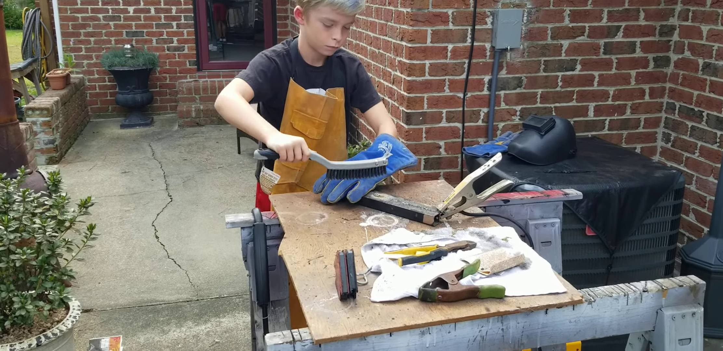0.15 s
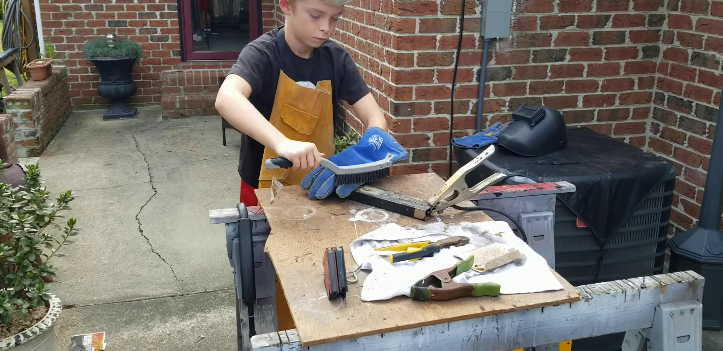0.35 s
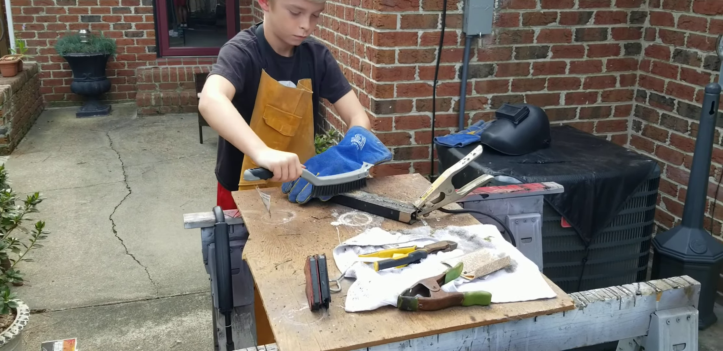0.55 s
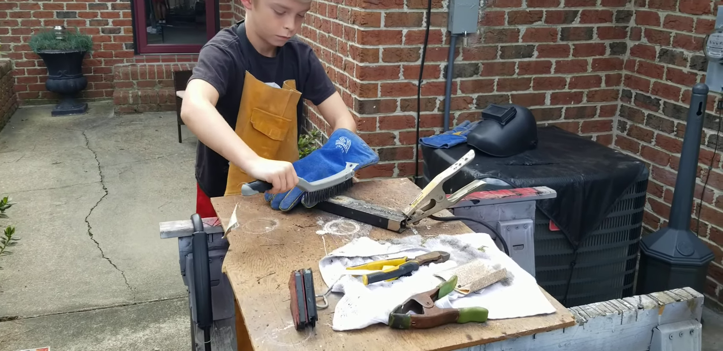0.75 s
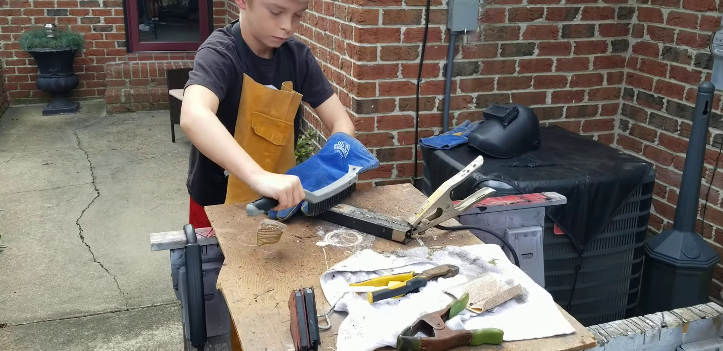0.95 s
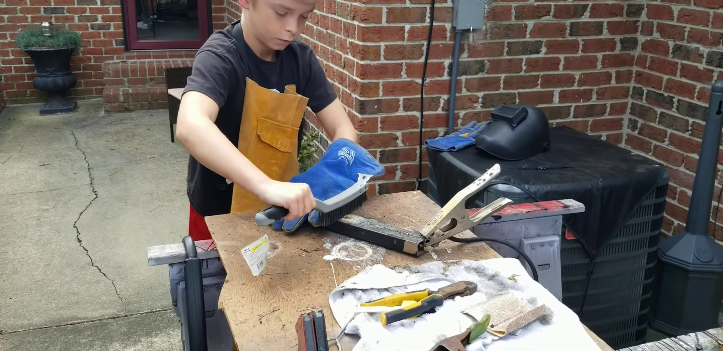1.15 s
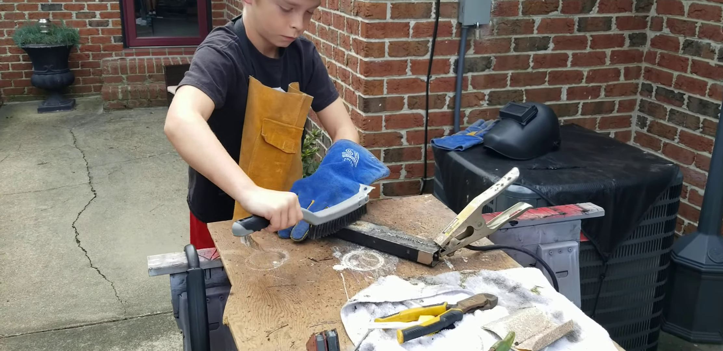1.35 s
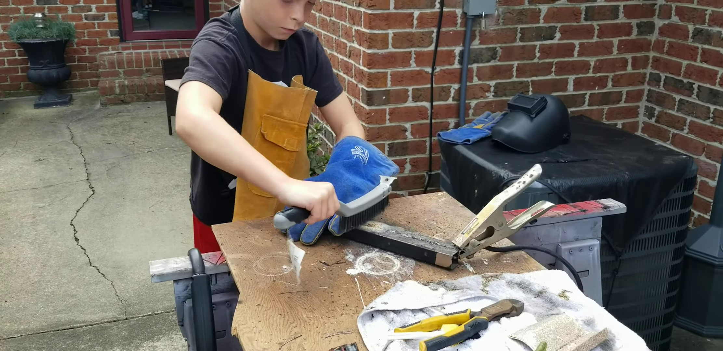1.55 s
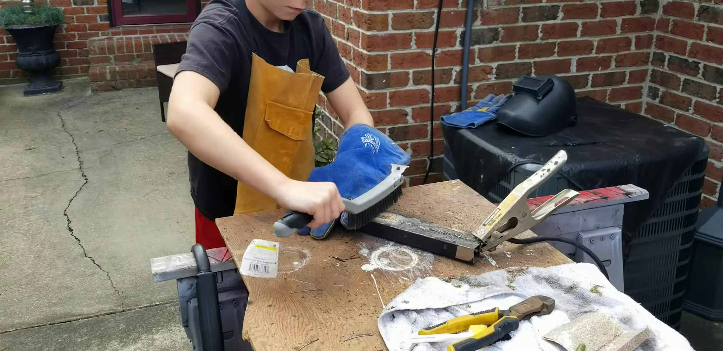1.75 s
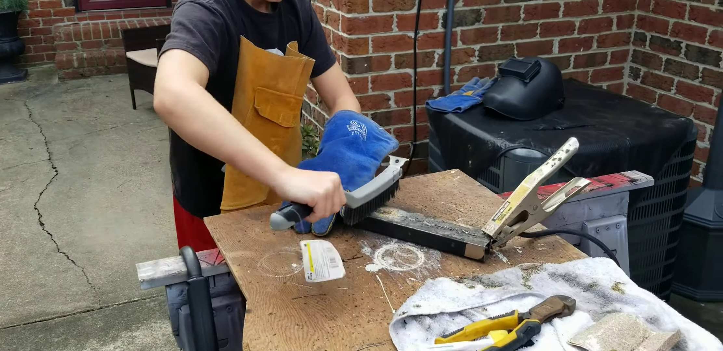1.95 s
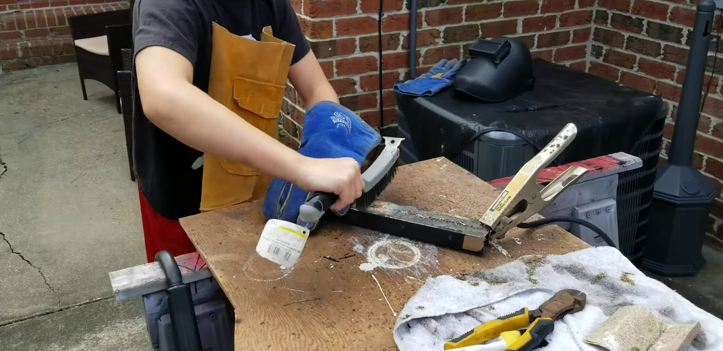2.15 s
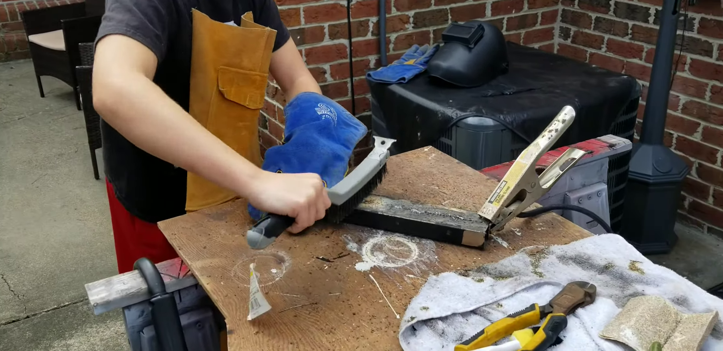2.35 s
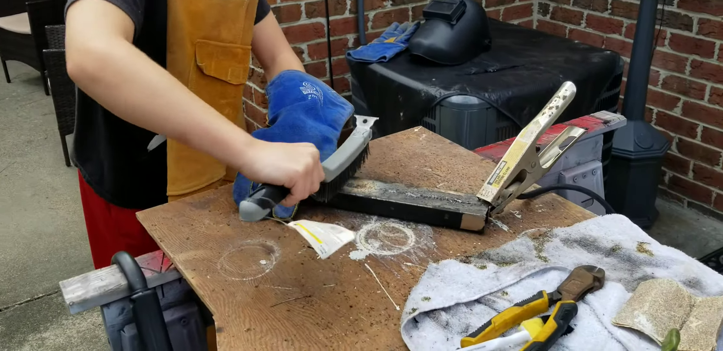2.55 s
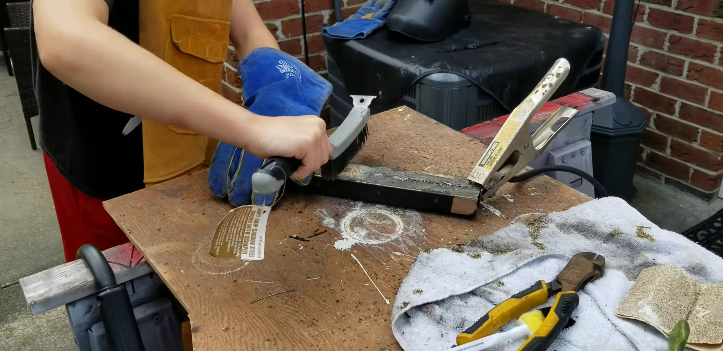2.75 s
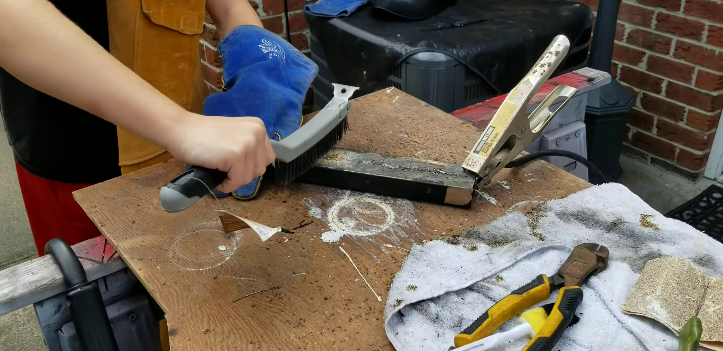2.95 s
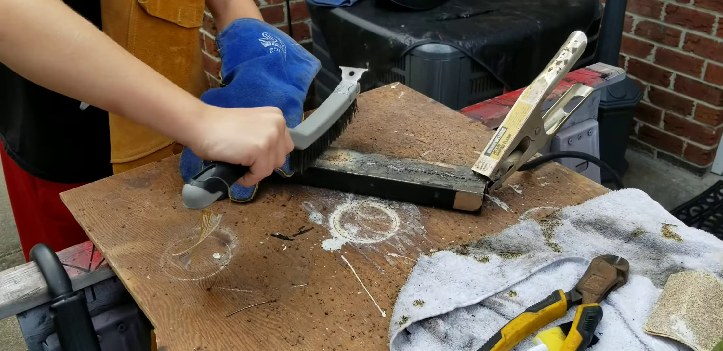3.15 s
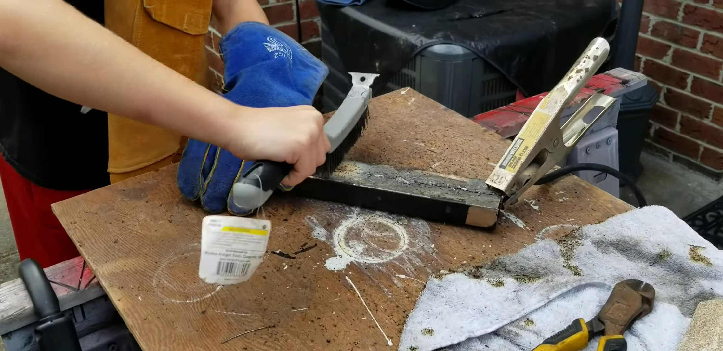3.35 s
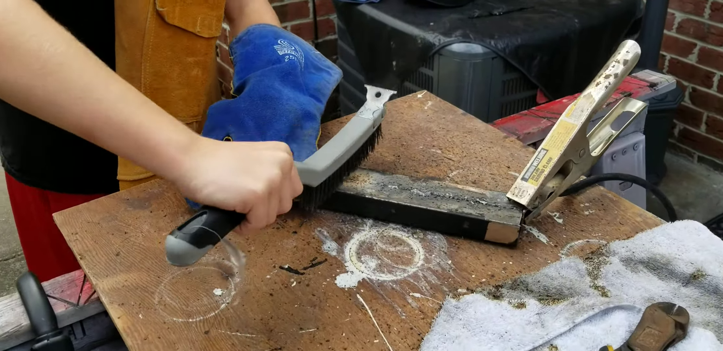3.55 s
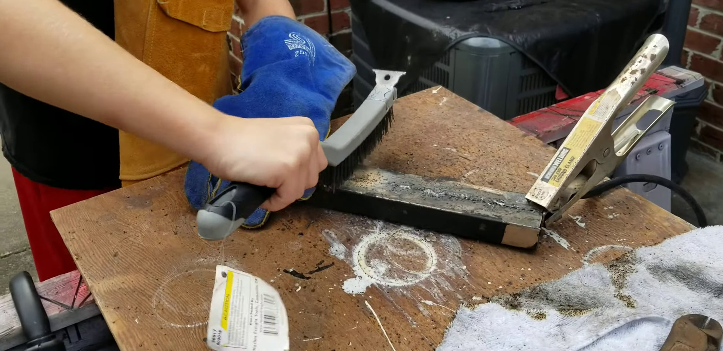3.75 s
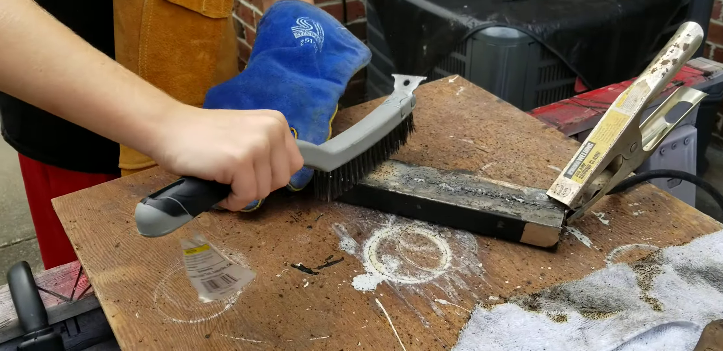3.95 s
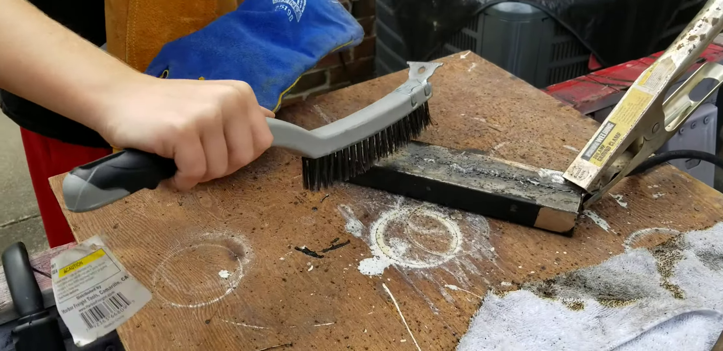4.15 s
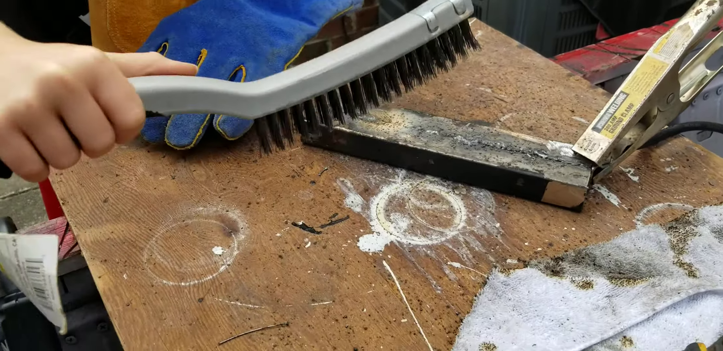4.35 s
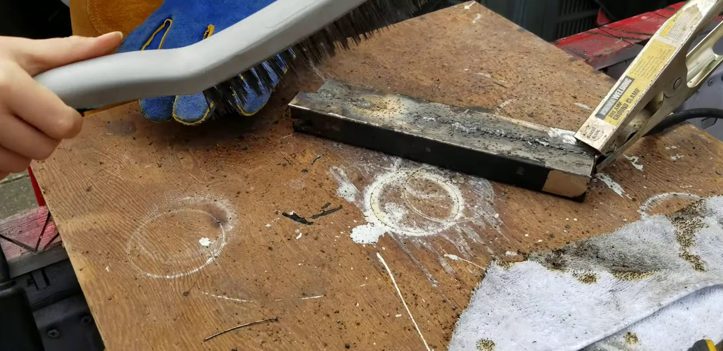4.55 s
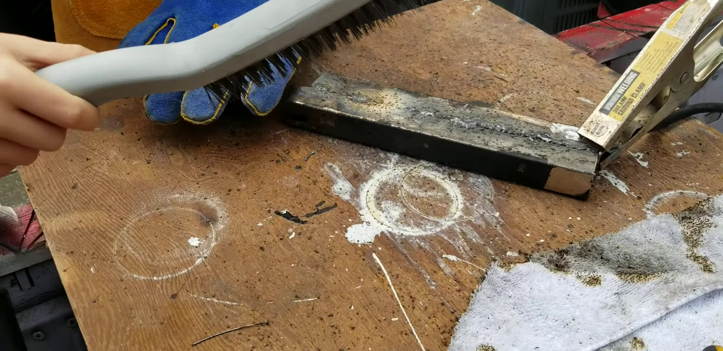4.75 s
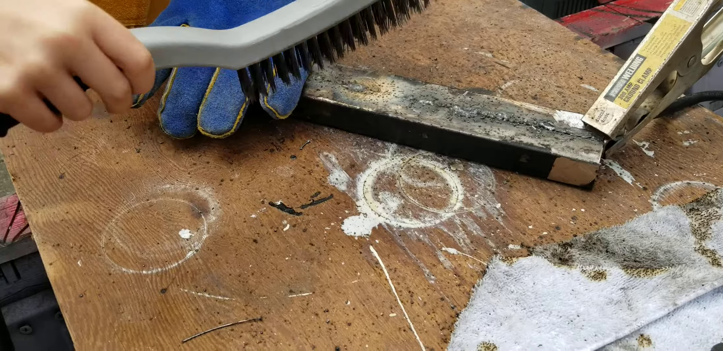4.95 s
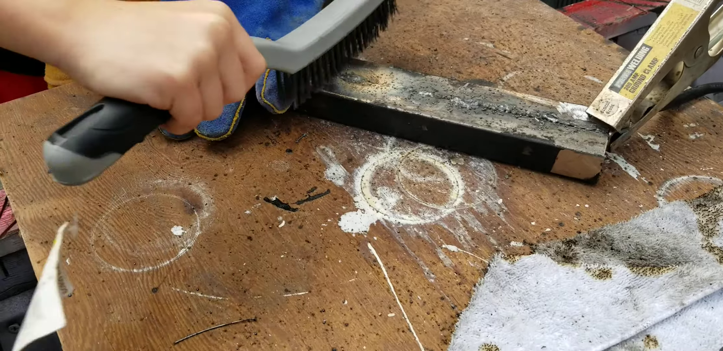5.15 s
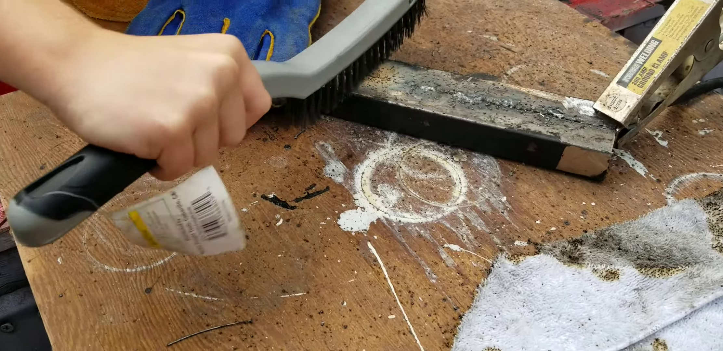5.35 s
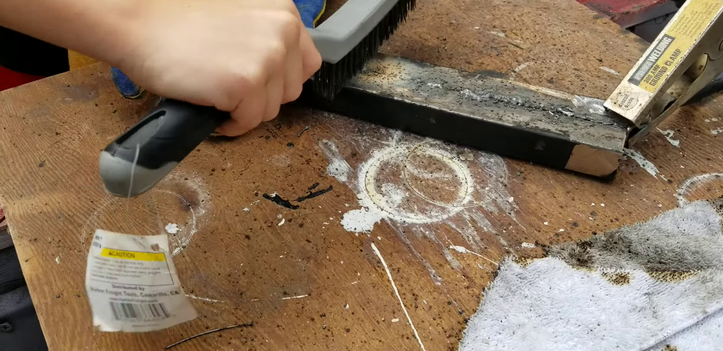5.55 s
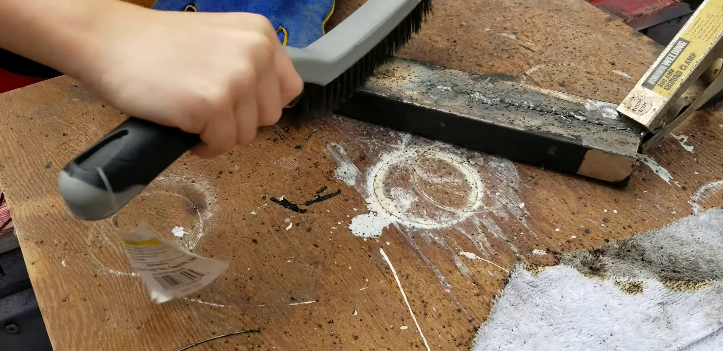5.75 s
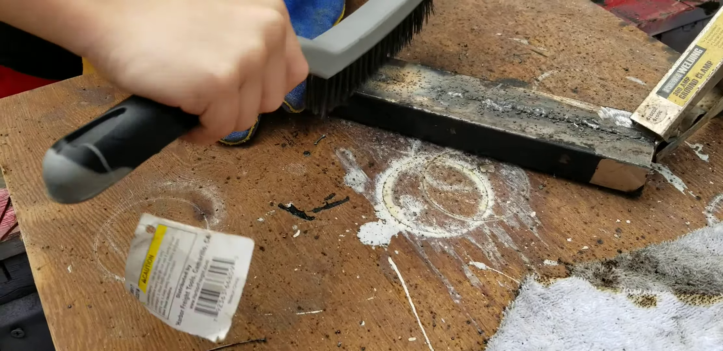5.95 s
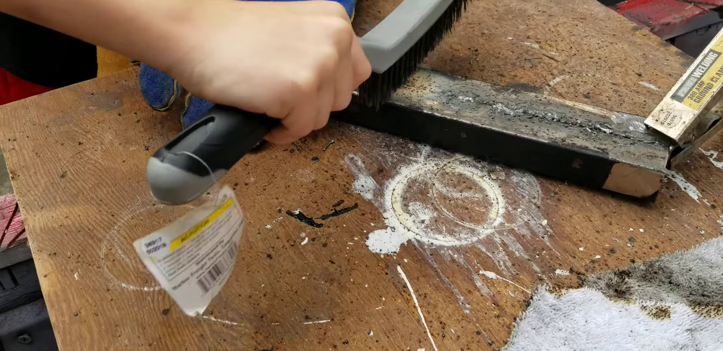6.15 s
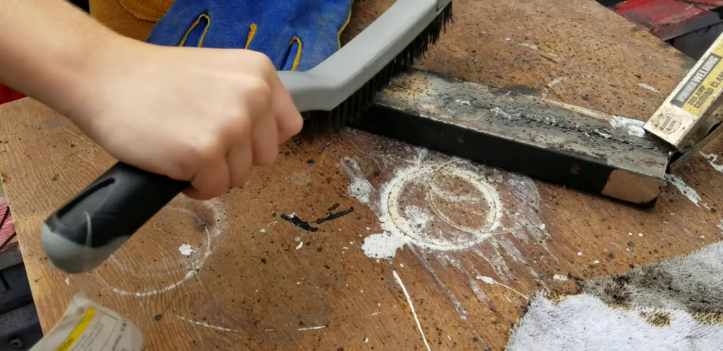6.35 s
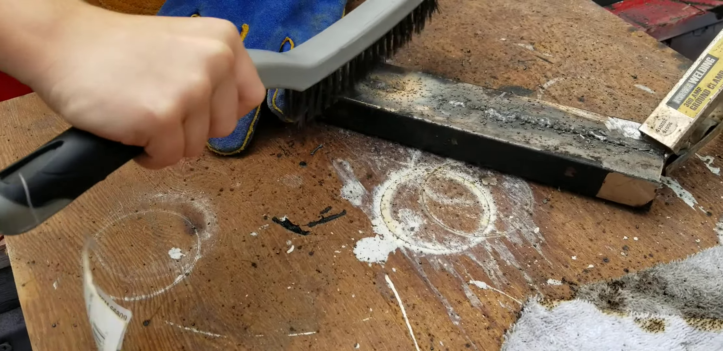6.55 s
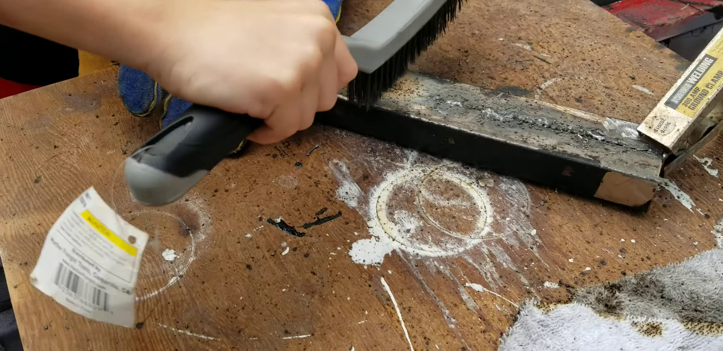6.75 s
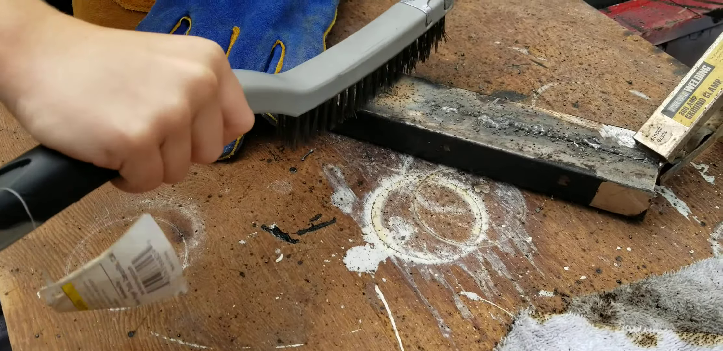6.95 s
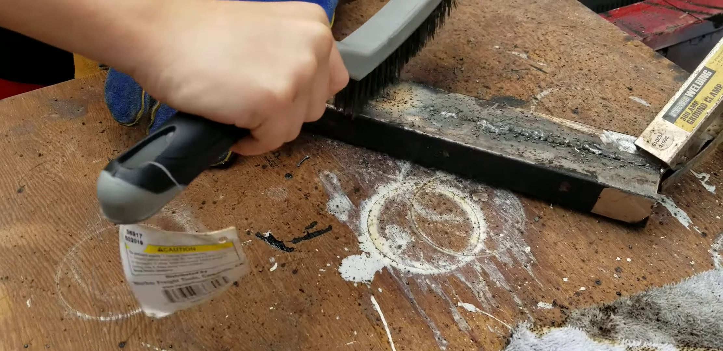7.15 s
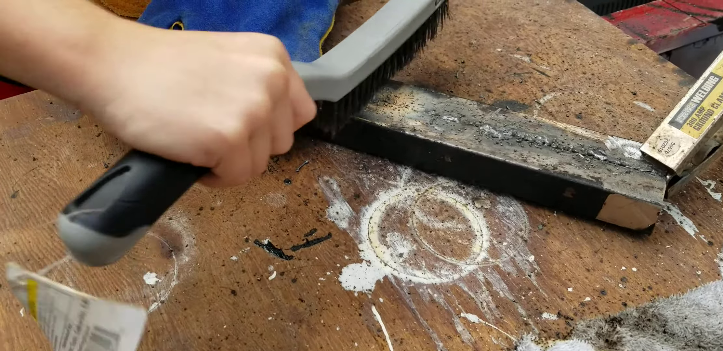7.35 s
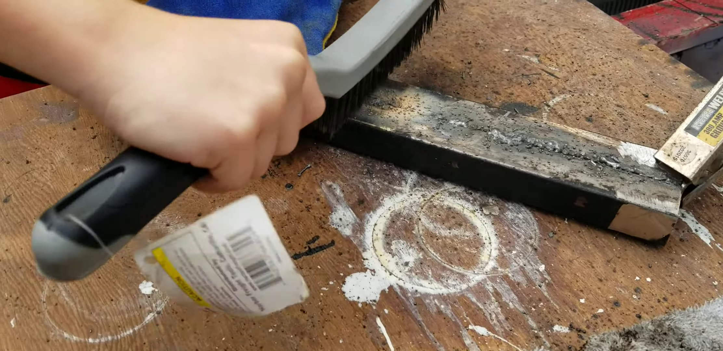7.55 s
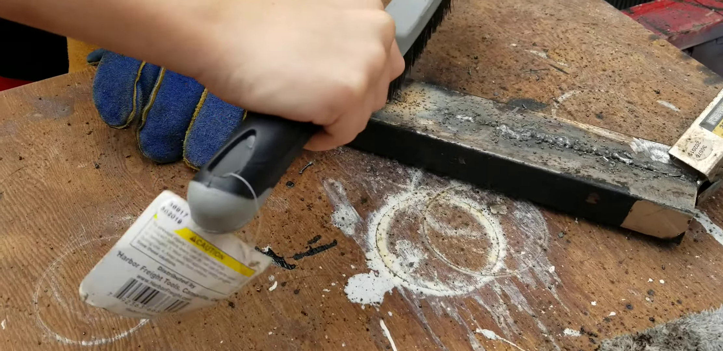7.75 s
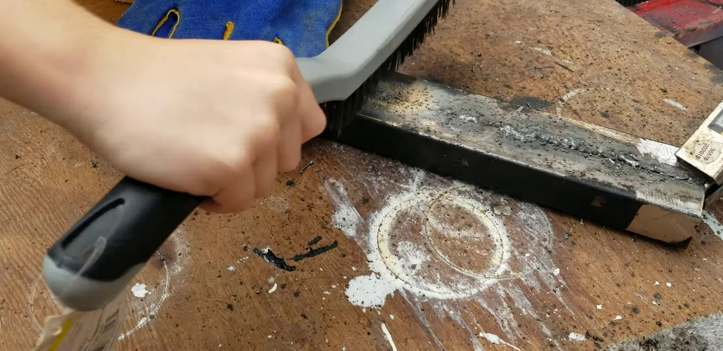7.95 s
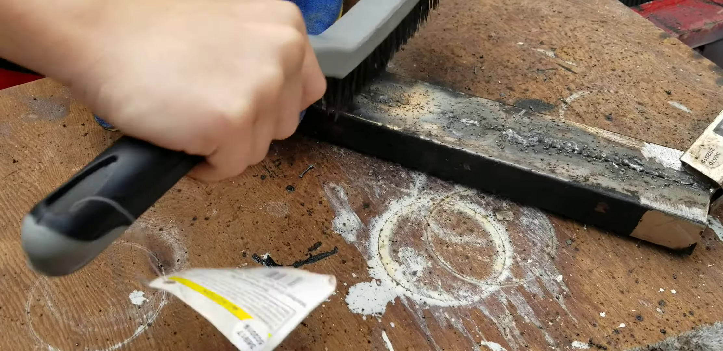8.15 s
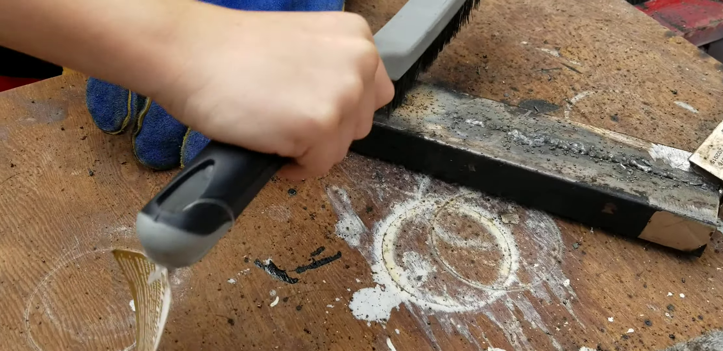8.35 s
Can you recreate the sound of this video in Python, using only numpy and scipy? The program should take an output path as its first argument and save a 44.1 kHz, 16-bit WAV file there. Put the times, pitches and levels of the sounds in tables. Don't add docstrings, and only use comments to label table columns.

```python
import sys
import numpy as np
from scipy import signal
from scipy.fft import rfft, irfft
from scipy.io import wavfile
from scipy.ndimage import uniform_filter1d

SR = 44100
rng = np.random.default_rng(int(sys.argv[2]) if len(sys.argv) > 2 else 0)


def file_out(sig):
    cols = np.atleast_2d(sig).T
    lim = np.clip(cols, -1, 1)
    pcm = np.round(lim * 32767).astype(np.int16)
    wavfile.write(sys.argv[1], SR, pcm)


def invert_db(level):
    return 10 ** (np.asarray(level, dtype=float) / 20)


N = 374850
TIME = np.arange(N) / SR
HZ = np.fft.rfftfreq(N, 1 / SR)
HOLD = 16
SLOW_TIME = TIME[::HOLD]


def evened(x):
    return x / np.sqrt(np.mean(x ** 2) + 1e-20)


def mixed(a, b, b_db):
    return evened(a) + invert_db(b_db) * evened(b)


def held(x):
    return np.repeat(x, HOLD)[:N]


def smooth_db(power):
    return uniform_filter1d(held(10 * np.log10(power)), size=160)


def read(points, hz):
    f, value = np.transpose(points)
    return np.interp(np.log(hz + 1), np.log(f + 1), value)


def wander(per_s, count):
    knots = rng.standard_normal((int(N / SR * per_s) + 2, count))
    places = np.arange(len(knots))
    return 1.22 * np.array([np.interp(SLOW_TIME * per_s, places, k) for k in knots.T])


def hiss(drive, colour, likeness, lead=((1, 0), (2, 0))):
    a, b = rfft(drive * rng.standard_normal((2, N)))
    same = np.clip(read(likeness, HZ), -1, 1)
    late = a * np.exp(-1j * read(lead, HZ))
    right = same * late + np.sqrt(1 - same ** 2) * b
    return irfft(np.array([a, right]) * invert_db(read(colour, HZ)), N)


def patchy(x, patch_db):
    z = signal.stft(x, nperseg=512, noverlap=384)[2]
    patches = uniform_filter1d(rng.standard_normal(z.shape), size=2, axis=1)
    patches = uniform_filter1d(patches, size=16, axis=2)
    return signal.istft(z * invert_db(patch_db * evened(patches)), nperseg=512, noverlap=384)[1][:, :N]


def snaps(per_s, spread_db, clump_db):
    size_db = spread_db * np.minimum(rng.exponential(1, N), 3.5)
    size_db = size_db + clump_db * held(wander(180, count=1)[0])
    return evened(invert_db(size_db) * (rng.random(N) < per_s / SR))


def ring(drive, modes, flicker_db, per_s, turns, order=1):
    out = np.zeros((2, N))
    for (hz, width, *db), drift in zip(modes, wander(per_s, count=len(modes))):
        pole = np.exp((2j * hz - width) * np.pi / SR)
        bout_db = np.where(SLOW_TIME < 4.5, db[0], db[-1])
        z = drive * rng.standard_normal(N) * held(invert_db(flicker_db * drift + bout_db))
        for _ in range(order):
            z = signal.lfilter([1 - abs(pole)], [1, -pole], z)
        other_drift = np.roll(drift, len(drift) // 3)
        lag = held(np.exp(-1j * turns * hz / 1000 * (1 + other_drift)))
        out[0] += z.real
        out[1] += (z * lag).real
    return out


# (frequency [Hz], level [dB per Hz])
AIR = [(20, -28), (62, -2), (86, -6), (125, -6), (160, -15), (290, -25), (420, -31), (1100, -30),
       (1600, -36.5), (2600, -54), (5000, -51.5), (6800, -63), (8800, -69), (10500, -46.5), (13000, -42.5),
       (16000, -51)]
# (frequency [Hz], likeness [-1 to 1])
AIR_SAME = [(60, 0.85), (180, 0.87), (550, 0.078), (1650, -0.38), (4970, 0.1), (15000, -0.28)]
# (time [s], level [dB])
SWELL = [(0, 5.5), (.4, 4.5), (4.2, 1.5)]


def air():
    x = evened(hiss(np.ones(N), AIR, AIR_SAME))
    x = x * invert_db(-49 + held(wander(2.2, count=1)[0]))
    low = signal.butter(2, 200, fs=SR, output="sos")
    hum = signal.sosfiltfilt(low, x)
    return hum + (x - hum) * invert_db(np.interp(TIME, *np.transpose(SWELL)))


def speed(share, fastest):
    u, p = np.clip(share, 0, 1), np.clip(fastest, .02, .98)
    return np.sin(np.pi / 2 * np.where(u < p, u / p, (1 - u) / (1 - p)))


LIFT_S, LIFT_DB = (4.0, 8.6), -51


def arches(bouts, law, lead=0):
    power, t = 1e-10, SLOW_TIME + lead
    for rows, lift in zip(bouts, LIFT_S):
        s, top_db, fastest, turn_db = np.transpose(rows)
        s = np.append(s, lift)
        k = np.clip(np.searchsorted(s, t) - 1, 0, len(rows) - 1)
        hand = speed((t - s[k]) / np.diff(s)[k], fastest[k])
        moving = invert_db(top_db[k]) * hand ** np.array(law)[k % 2]
        drag = invert_db(np.interp(t, s, np.append(turn_db, LIFT_DB), left=-100, right=-100))
        power = power + moving ** 2 + drag ** 2
    return power


# (turn time [s], full-speed fizz level [dB], fastest point [share 0-1], fizz level at the turn [dB])
STROKES_A = [(0.546, -43, 0, -61), (0.675, -35.5, 0.7, -54), (0.766, -33, 0.07, -38.5),
             (0.95, -37, 0.23, -52.5), (1.073, -26, 0.34, -52.5), (1.253, -30.5, 0.51, -45),
             (1.367, -23.5, 0.39, -49), (1.552, -31.5, 0.45, -48), (1.701, -21.5, 0.32, -40.5),
             (1.887, -30, 0.44, -41), (2.028, -24.5, 0.22, -41.5), (2.201, -29, 0.34, -49),
             (2.343, -23, 0.34, -49), (2.497, -32, 0.6, -49), (2.634, -25, 0.25, -42),
             (2.825, -31, 0.67, -44), (2.977, -24, 0.39, -46), (3.145, -35.5, 0.2, -30.5),
             (3.241, -25, 0.42, -40), (3.426, -25, 0.49, -33), (3.585, -21, 0.35, -34.5),
             (3.737, -29, 0.3, -38.5), (3.902, -38, 0.65, -48)]
# (time [s], level [dB], fastest [share 0-1], level at the turn [dB])
STROKES_B = [(5.118, -40, 0.3, -47.5), (5.272, -33.5, 0.14, -47.5), (5.418, -24, 0.43, -46),
             (5.568, -32, 0.52, -40.5), (5.701, -24, 0.25, -35.5), (5.896, -33.5, 0.9, -37),
             (6.032, -21, 0.38, -36), (6.166, -28.5, 0.71, -35.5), (6.302, -25, 0.28, -33.5),
             (6.478, -30, 0.9, -29.5), (6.584, -24.5, 0.63, -32.5), (6.787, -27, 0.94, -31),
             (6.949, -20, 0.35, -40.5), (7.145, -29, 0.83, -35.5), (7.284, -21, 0.48, -42.5),
             (7.475, -28, 0.6, -36), (7.599, -21.5, 0.52, -40), (7.777, -27, 0.44, -33.5),
             (7.913, -23, 0.65, -36), (8.091, -26.5, 0.4, -39), (8.226, -22, 0.52, -32),
             (8.442, -27, 0.86, -39.5)]
# (start time [s], length [s], fizz level [dB], fastest point [share 0-1])
RUSTLES = [
    (0.39, 0.13, -63, 0.3),
    (0.5, 0.06, -49, 0.8),
    (3.62, 0.25, -63.5, 0.3),
    (4.812, 0.145, -66, 0.03),
    (3.3, .08, -60, .4),
]


def strokes():
    t, slack_s = SLOW_TIME, 0.0096
    rustle = 0
    for s, length, db, fastest in RUSTLES:
        rustle = rustle + invert_db(db) ** 2 * speed((t - s) / length, fastest) ** 3
    ahead = np.transpose(DIGS)[0][:, None] - t
    slack_db = -3.5 * (np.exp(-abs(ahead) / slack_s) * (ahead > 0)).max(0)
    return smooth_db(arches((STROKES_A, STROKES_B), law=(2.01, 1.31)) + rustle) + held(slack_db)


# (time [s], fizz peak level [dB], scrape over fizz [dB], bench over fizz [dB])
DIGS = [(0.4218, -46, -26, 4), (0.506, -49, -13, -9), (0.5193, -41, -19, 13), (0.547, -19, -12, -15),
        (0.705, -24.5, -38, -31), (0.774, -27, -22, -25), (0.959, -28.5, -21.5, 6), (1.0836, -41, -6, -10),
        (1.273, -21, -27, -23), (1.394, -32, -26, -22), (1.5713, -19.5, -33, -15), (1.722, -19, -34, -18),
        (1.899, -24, -13, -8), (2.05, -22, -28, -15.5), (2.22, -35, -10, -7), (2.365, -34, -18, -19),
        (2.515, -30, -15, -15), (2.539, -19, -14, -10), (2.996, -24, -19, -18), (3.9746, -36, -27, 4.5),
        (4.1964, -46, -30, -8), (4.4243, -62, -21.5, 2.5), (4.6957, -60, -5, 1), (5.1238, -20.5, -11.5, 1),
        (5.5917, -26.5, -2, -5), (6.9755, -20, -11, -21), (7.3083, -16, -11, -15), (7.9455, -20.5, -6, -1),
        (8.109, -22, -6, -18.5)]
# (time [s], peak level [dB])
NICKS = [(0.6883, -26), (1.1048, -23.5), (1.4157, -15.5), (1.6, -8.5), (1.9167, -21), (3.4678, -15.5),
         (3.6082, -18), (3.7683, -17.5), (6.0562, -15), (6.1933, -12.5), (6.5161, -16), (7.1792, -10),
         (7.2515, -20), (7.3413, -14), (7.5213, -16), (7.641, -21), (7.804, -8), (8.1594, -15),
         (8.2468, -17), (8.4851, -14.5)]
KNOCKS = DIGS + [(s, db - 8.5, -15, -40) for s, db in NICKS]
KNOCK_S = 0.0031


def played(level_db, knock_db, train, voice):
    drive = train * invert_db(level_db)
    for row, db in zip(KNOCKS, knock_db):
        place = drive[round(row[0] * SR):][:4000]
        place += invert_db(db) * np.exp(-TIME[:len(place)] / KNOCK_S)
    out = voice(drive)
    return out * np.sqrt(np.mean(drive ** 2) / np.mean(out.mean(0) ** 2))


# (frequency [Hz], level [dB per Hz])
FIZZ = [(4410, -17.5), (7500, -6), (8350, -31), (8740, -6.5), (9460, 2.5), (10500, 3), (12900, 9.5),
        (15500, 0), (16100, -44.5), (16400, -36.5)]
# (frequency [Hz], likeness [0-1])
SAME = [(60, 1), (130, 0.69), (290, 0.99), (640, 0.84), (1410, 1), (3100, 0.34), (6820, 0.36),
        (15000, 0.42)]
# (frequency [Hz], phase [rad])
LEAD = [(0, -1.5), (1890, 0.5), (3530, -5), (5860, 6.5), (6290, 5), (8960, 14.5), (12400, -11.5),
        (16100, -10)]
# (frequency [Hz], width [Hz])
BAR_HIGH = [(8958, 32), (9437, 40), (10125, 45), (10824, 34), (11690, 40), (12430, 55), (12610, 80),
            (12908, 55), (13498, 70), (14965, 45)]
# (level in the first bout [dB], level in the second bout [dB])
HIGH_DB = [(-15, 5), (1, -13.5), (2, -4), (5.5, 9), (-5, 3), (3, 8), (-9.5, 3), (-9.5, -8.5), (8.5, 2.5),
           (-15, -18)]


def fizz(stroke_db):
    def voice(drive):
        tips = patchy(hiss(drive, FIZZ, SAME, LEAD), 4.3)
        steel = ring(drive, np.c_[BAR_HIGH, HIGH_DB], 3.5, 18, turns=0.24)
        return mixed(tips, steel, -4.0)

    knock_db = [k[1] - 7 for k in KNOCKS]
    return played(stroke_db - 4.0, knock_db, snaps(8000, 1.3, 1.75), voice)


# (time [s], scrape over fizz level [dB])
BITE = [(0.42, -18), (0.52, -13.5), (0.58, -10.5), (0.8, -13.5), (1.8, -13.5), (2.6, -8.5), (3.7, -12.5),
        (4.0, -7.5), (4.85, -14.5), (5.2, -8.5), (6.9, -8.5), (8.4, -7.5)]
# (frequency [Hz], level [dB per Hz])
SCRAPE = [(470, -9), (800, -6.5), (913, -20.5), (1820, -12), (2110, -14.5), (2590, -2.5), (3810, -3.5),
          (5880, -0.5), (6640, -9.5), (9000, -8.5), (11700, -33), (19800, -120)]
# (frequency [Hz], width [Hz])
BAR_LOW = [(2637, 24), (2990, 30), (3500, 40), (4180, 60), (4685, 45), (5115, 65), (5641, 16), (5824, 40),
           (6246, 26), (6990, 28), (7360, 35), (7890, 90), (6017, 30)]
# (level in the first bout [dB], level in the second bout [dB])
LOW_DB = [(3.5, 3.5), (-11, -9), (-25, -14.5), (-5, -6), (-1.5, -1.5), (3, 3), (-11, -15), (-6, 1.5),
          (1, 4.5), (1.5, -11.5), (-20.5, -27), (-28, -13), (-27, -8)]


def scrape(stroke_db, load_db):
    def voice(drive):
        grind = patchy(hiss(drive, SCRAPE, SAME, LEAD), 5.0)
        steel = ring(drive, np.c_[BAR_LOW, LOW_DB], 3.4, 22, turns=0.18)
        return mixed(grind, steel, -4.5)

    pressed_db = 0.16 * (np.maximum(load_db, -55) + 32.0)
    level_db = 0.64 * (stroke_db + 26.0) - 27.5 + pressed_db
    level_db = level_db + np.interp(TIME, *np.transpose(BITE))
    knock_db = [k[1] + k[2] - 3 for k in KNOCKS]
    return played(level_db, knock_db, snaps(3200, 1.83, 0.79), voice)


# (rumble level [dB], heaviest point [share 0-1], rumble level at the turn [dB])
LOADS_A = [(-35.5, 0, -52), (-52, .7, -57.5), (-41, 0.2, -55.5), (-35, 0, -50), (-39, .05, -40.5),
           (-36.5, 0.5, -63), (-35.5, .2, -43), (-32, .5, -66), (-32, 0, -43.5), (-35.5, 0.5, -62),
           (-33.5, 0.2, -46), (-30.5, .32, -58), (-33.5, 0.05, -46), (-29, 0.61, -59), (-36, .2, -47),
           (-40.5, 0.4, -39.5), (-35, 0.3, -38), (-35.5, 0.6, -43.5), (-34, 0.77, -39),
           (-30.5, 0.48, -41.5), (-33, .22, -45), (-31.5, .48, -45), (-48, 0.4, -49.5)]
# (rumble level [dB], heaviest point [share 0-1], rumble level at the turn [dB])
LOADS_B = [(-35.5, 0, -54), (-32, 0.4, -36.5), (-33, 0.1, -61), (-29.5, 0.43, -48.5), (-38.5, 0.1, -35),
           (-28.5, 0.44, -45), (-32.5, 0.23, -43.5), (-28.5, 0.76, -51.5), (-36, .36, -38.5),
           (-36.5, .95, -46.5), (-35.5, 0.9, -34.5), (-30, 0.83, -49), (-33, 0.16, -38.5), (-33, .85, -44),
           (-33.5, 0.46, -44), (-34, .67, -46.5), (-33.5, 0.5, -43.5), (-31, 0.49, -45), (-35, 0.6, -45.5),
           (-37, 0.3, -46.5), (-37, 0.4, -39.5), (-32, 0.4, -44.5)]


def loads():
    bouts = []
    for rows, weights in ((STROKES_A, LOADS_A), (STROKES_B, LOADS_B)):
        bouts.append(np.c_[np.transpose(rows)[0], weights])
    return smooth_db(arches(bouts, law=(1.25, 1.33), lead=0.0073))


# (frequency [Hz], width [Hz], level in the first bout [dB], level in the second bout [dB])
BENCH = [(62, 15, -24, -5.5), (113.6, 57, -1, 2), (150.7, 39, -12.5, -2.5), (201, 55, -6, -2.5),
         (265.2, 61, -1, 3.5), (311.2, 47, -2.5, -10), (412, 79, -30.5, -12.5), (501, 47, -17, -14.5),
         (581, 100, -15, -8.5), (687, 114, -16.5, -20), (920.4, 62, -24, -17.5), (1546, 89, -34.5, -25.5)]
# (frequency [Hz], level [dB per Hz])
RATTLE = [(500, -14.5), (800, -22), (1300, -4), (1800, -7), (2300, -3), (3500, -33)]


def bench(load_db):
    def voice(drive):
        boom = ring(drive, BENCH, 2.7, 12, turns=0.26, order=2)
        rattle = patchy(hiss(drive, RATTLE, SAME), 5.7)
        return mixed(boom, rattle, -21.5)

    knock_db = [k[1] + k[3] - 4 for k in KNOCKS]
    return played(load_db - 0.6, knock_db, snaps(1800, 2.2, 1.4), voice)


def ticks():
    out, t = np.zeros((2, N)), TIME[:400]
    bright = signal.butter(2, 7000, "high", fs=SR, output="sos")
    for row, noise in zip(DIGS, rng.standard_normal((len(DIGS), 2, len(t)))):
        click = signal.sosfilt(bright, noise * np.exp(-t / 0.00032))
        out[:, round(row[0] * SR):][:, :len(t)] += invert_db(row[1] - 9) * click / abs(click).max()
    return out


def rung(s, db, hz, length):
    t, rise_cycles = TIME[:6000], 0.7
    swell = 1 - np.exp(-t * hz / rise_cycles)
    tone = np.sin(2 * np.pi * hz * t) * swell * np.exp(-t / length)
    return round(s * SR), invert_db(db) * tone / abs(tone).max()


# (time [s], peak level [dB], pitch [Hz])
THUMPS = [(0.545, -22.5, 134.5), (0.957, -28.5, 99), (1.084, -28, 135), (1.261, -33, 106),
          (1.398, -33, 116), (1.577, -30, 301), (1.903, -29, 109), (2.037, -31.5, 308), (2.214, -24, 285),
          (2.359, -29.5, 116), (2.537, -26.5, 117), (2.669, -32.5, 280), (2.932, -28, 277),
          (2.989, -26.5, 291), (3.168, -23.5, 255), (3.301, -30, 266), (3.36, -34.5, 127),
          (3.476, -24.5, 280), (3.606, -27, 259), (3.777, -25.5, 225), (3.903, -33, 215), (5.119, -22, 109),
          (5.306, -24, 248), (5.437, -20, 253), (5.574, -23, 259), (5.711, -28, 264), (5.925, -20, 95),
          (6.038, -27, 190), (6.223, -17, 124), (6.545, -29, 111), (6.909, -14, 201), (6.989, -22, 136),
          (7.173, -25, 253), (7.224, -15.5, 140), (7.316, -20, 256), (7.39, -28, 277), (7.535, -26.5, 121),
          (7.634, -30, 136), (7.812, -26, 204), (7.943, -27, 111), (8.109, -33, 102), (8.345, -27.5, 105)]
# (time [s], peak level [dB], pitch [Hz], length [s])
PINGS = [
    (0.55, -36, 7000, 0.014),
    (0.551, -42, 7400, .01),
    (0.63, -51, 4600, 0.024),
    (5.75, -36, 2615, .018),
    (8.314, -28, 8960, 0.016),
]


def blows():
    out = np.zeros(N)
    tones = [rung(s, db - 6, hz, 2.4 / hz) for s, db, hz in THUMPS]
    tones += [rung(*ping) for ping in PINGS]
    for at, tone in tones:
        out[at:][:len(tone)] += tone[:N - at]
    return out


# (time [s], peak level [dB], pitch [Hz], length [s])
TAPS = [(0.546, -32.5, 4600, 0.001), (0.87, -38, 1270, 0.02), (2.544, -40, 1600, .006),
        (3.193, -37.5, 1520, 0.076), (3.81, -37.5, 1295, 0.0214), (4.051, -48.5, 1020, 0.079),
        (5.123, -18.5, 170, 0.0076), (5.161, -33, 1520, 0.0062), (5.383, -37, 1700, .002),
        (5.441, -20, 225, 0.015), (6.917, -18.5, 181, 0.0072), (5.69, -20, 2470, 0.0016),
        (7.462, -17.5, 5160, 0.00098), (7.57, -32, 1100, .0015), (5.69, -29.5, 1100, 0.0017),
        (7.458, -27, 1880, .0012), (1.28, -38.5, 1550, 0.071), (1.594, -36.5, 1600, 0.032),
        (1.754, -41, 1350, .03)]


def taps():
    out, t = np.zeros(N), TIME[:6000]
    for (s, db, hz, length), noise in zip(TAPS, rng.standard_normal((len(TAPS), len(t)))):
        band = signal.butter(3, [0.4 * hz, 1.43 * hz], "band", fs=SR, output="sos")
        burst = signal.sosfilt(band, noise * np.exp(-t / length))
        out[round(s * SR):][:len(t)] += invert_db(db) * burst / abs(burst).max()
    return out


# (time [s], treble level, left over right [dB])
TILT = [
    (0.0, 8),
    (0.5, 27),
    (2.03, 15.5),
    (8.5, 11.5),
]


def turning():
    lean_db = np.interp(TIME, *np.transpose(TILT)) - 10.5
    return invert_db(np.outer([.3, -.7], lean_db))


def scene():
    stroke_db, load_db = strokes(), loads()
    bright = fizz(stroke_db) + ticks()
    dull = scrape(stroke_db, load_db) + bench(load_db) + blows() + taps()
    return air() + bright * turning() + dull


# (frequency [Hz], level, left over right [dB])
PORTS = [(60, 5), (110, 4.5), (200, 2.5), (380, 3), (700, 4), (1290, 5), (2380, -2), (4400, 0.5),
         (8120, 11), (15000, 9)]


def ported(dry):
    return irfft(rfft(dry) * invert_db(np.outer([.4, -.6], read(PORTS, HZ))), N)


# (frequency [Hz], depth [dB])
HOLES = [(1800, 30), (2100, 2.5), (2600, 7), (3300, 3), (4000, 2.5), (5000, 3.5), (5800, 6.5), (8400, 6),
         (8800, 30)]


def thinned(x, quiet_db):
    hz, t, z = signal.stft(x, SR, nperseg=1024, noverlap=768)
    power = uniform_filter1d((abs(z) ** 2).sum(0), size=8, axis=1)
    share = uniform_filter1d(power, size=4, axis=0) / uniform_filter1d(power, size=45, axis=0)
    usual = np.sqrt(np.median(share, axis=1))
    weak = share < (usual * invert_db(-2 * read(HOLES, hz)))[:, None]
    weak = weak[np.arange(len(hz)) // 4 * 4][:, np.arange(len(t)) // 4 * 4]
    loud = power[hz > 2000].mean(0) > invert_db(2 * quiet_db)
    return signal.istft(z * ~(weak & loud), SR, nperseg=1024, noverlap=768)[1][:, :N]


def band_limit(x):
    return signal.sosfilt(signal.butter(12, 16510, fs=SR, output="sos"), x)


def record(dry):
    rounded = .75 * np.tanh(ported(dry) / .75)
    top = invert_db(-np.clip((HZ - 15740) / 2.5, 0, 60))
    rumble_cut = 1 / (1 + (27 / (HZ + 1)) ** 4)
    limited = irfft(rfft(rounded) * top * rumble_cut, N)
    heard = thinned(limited, quiet_db=-78)
    return band_limit(heard)


dry = scene()
out = record(dry)
file_out(out)
```